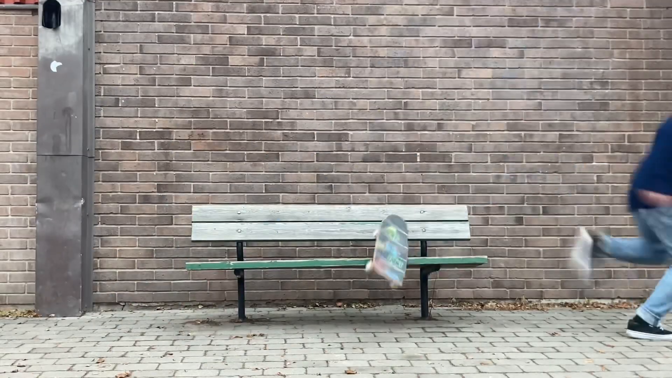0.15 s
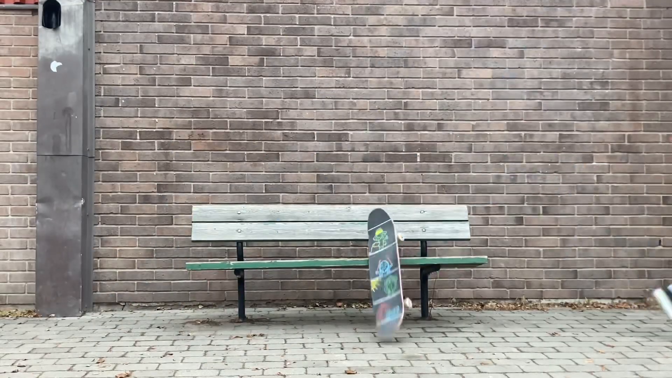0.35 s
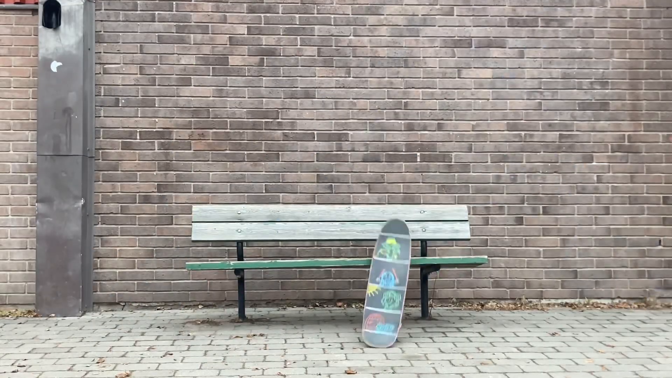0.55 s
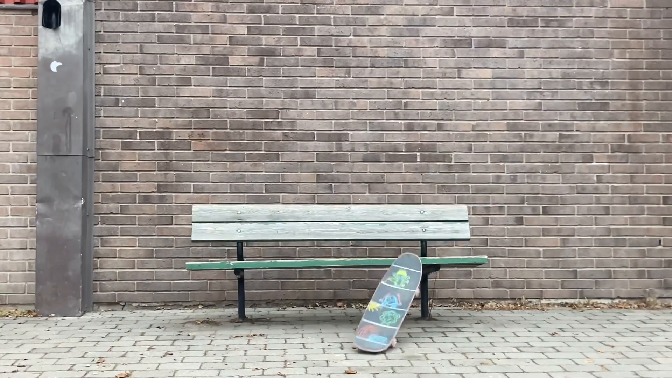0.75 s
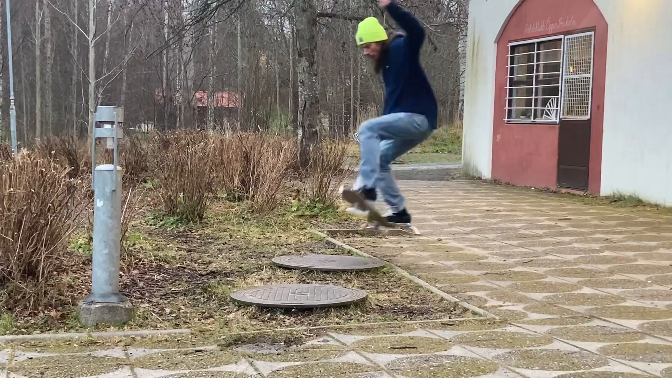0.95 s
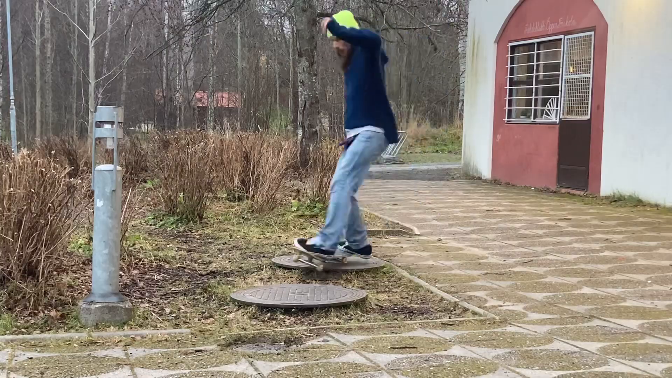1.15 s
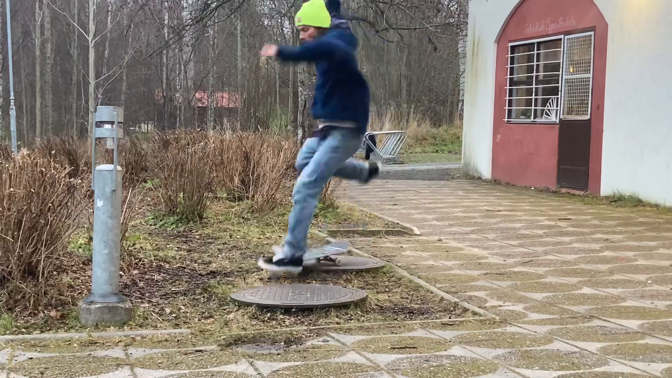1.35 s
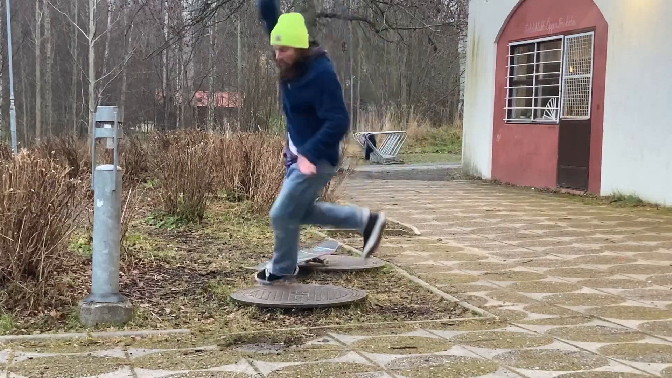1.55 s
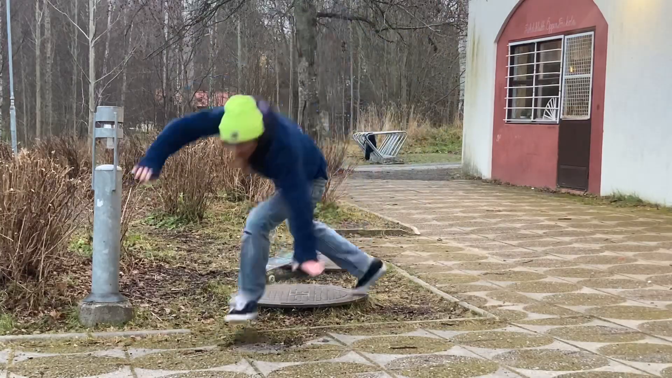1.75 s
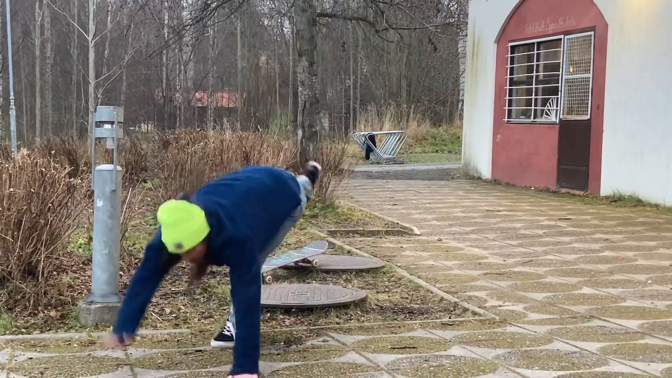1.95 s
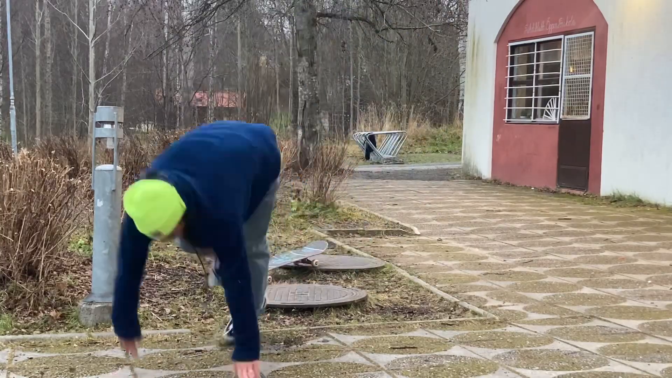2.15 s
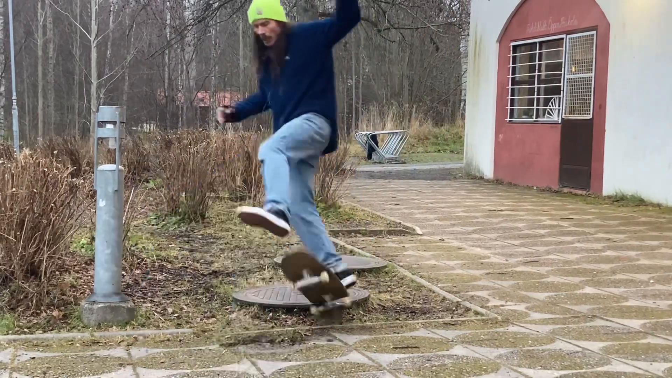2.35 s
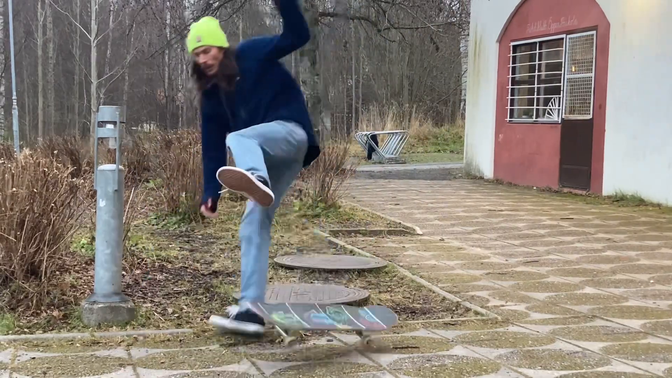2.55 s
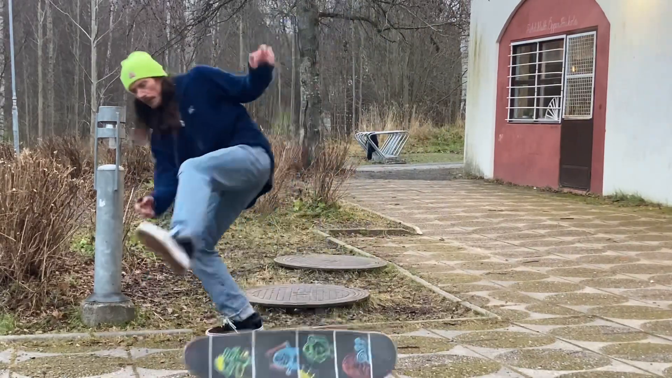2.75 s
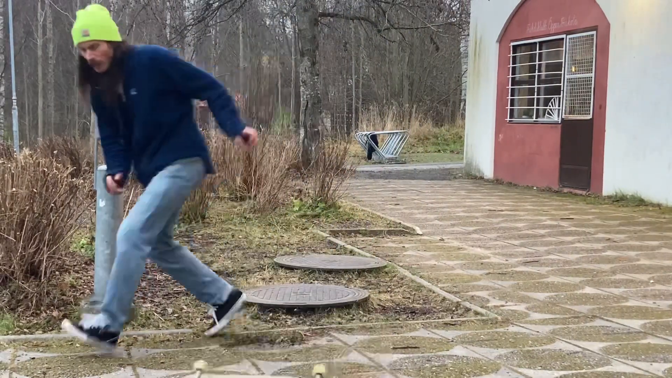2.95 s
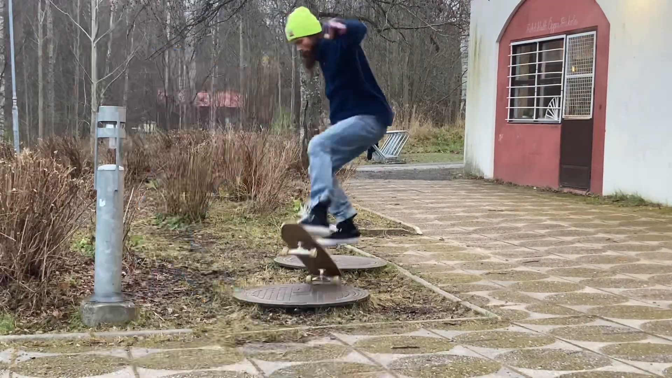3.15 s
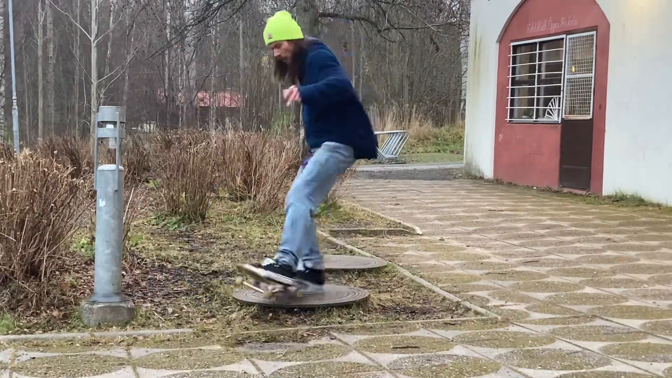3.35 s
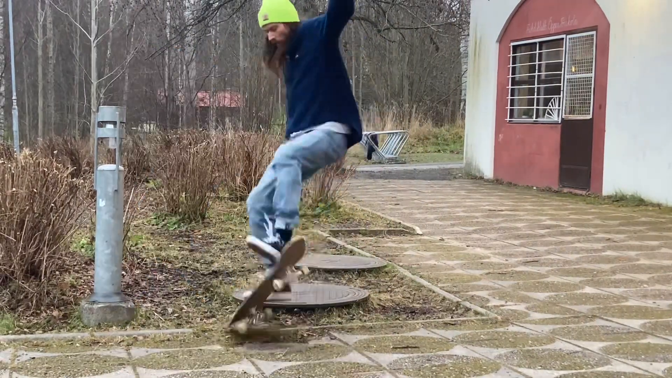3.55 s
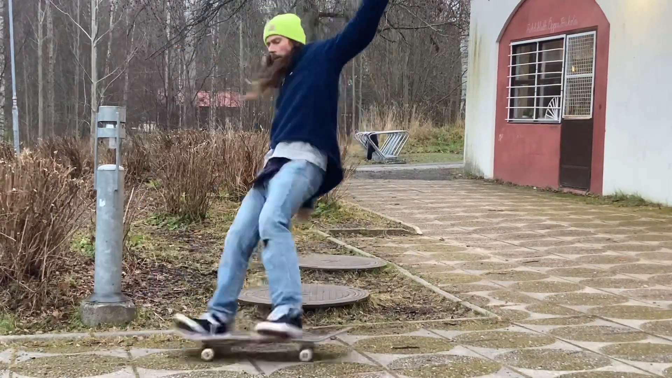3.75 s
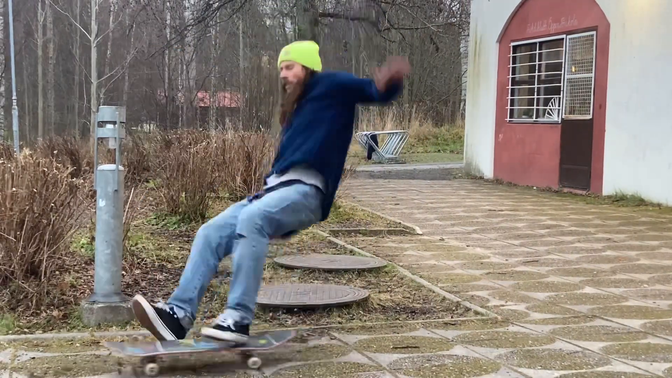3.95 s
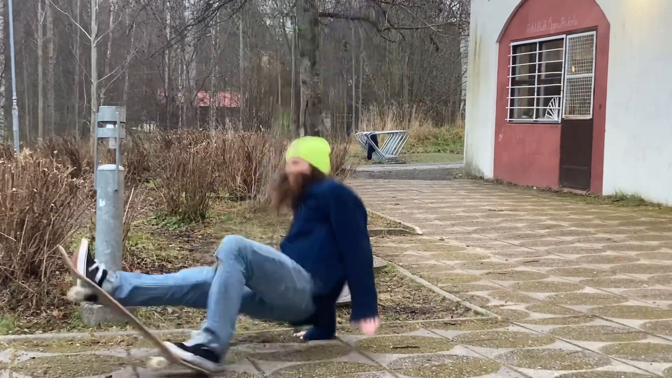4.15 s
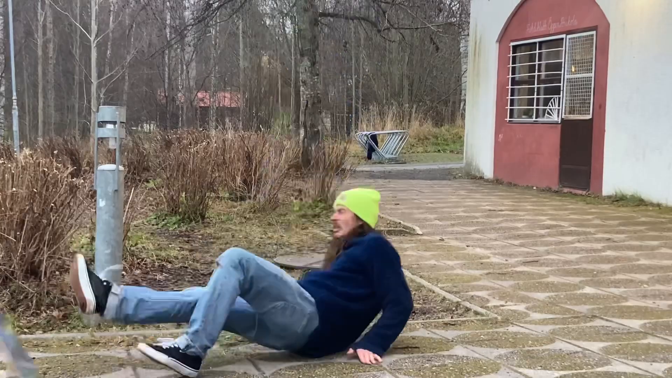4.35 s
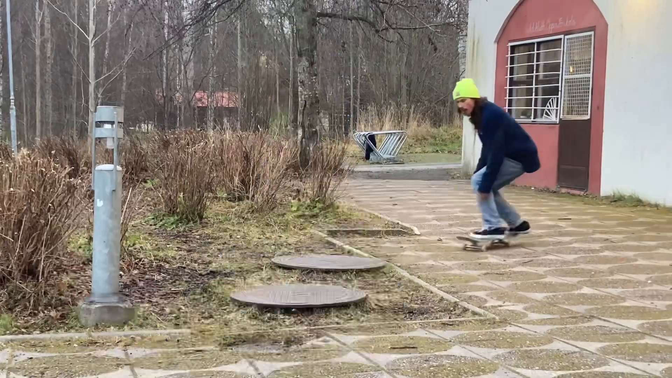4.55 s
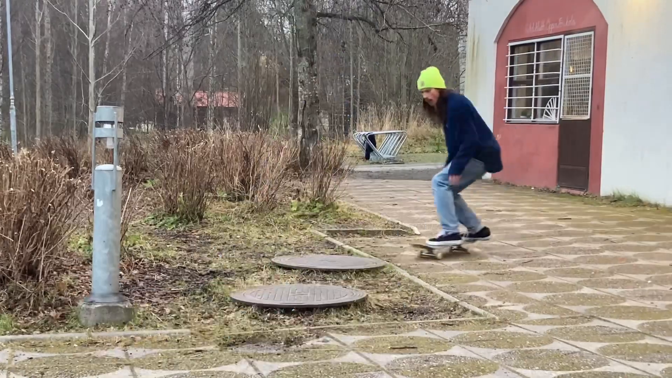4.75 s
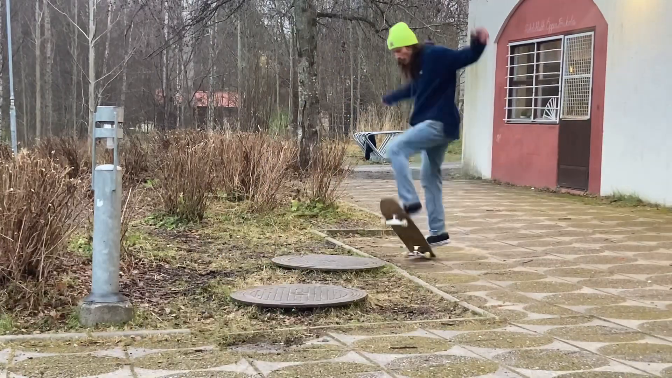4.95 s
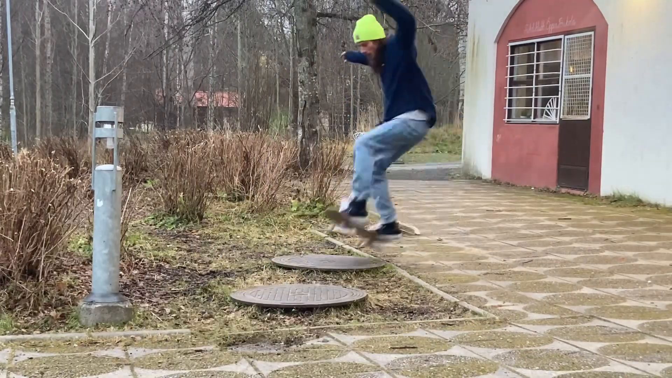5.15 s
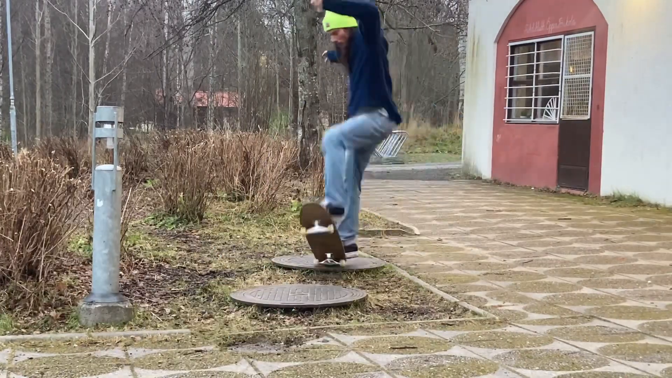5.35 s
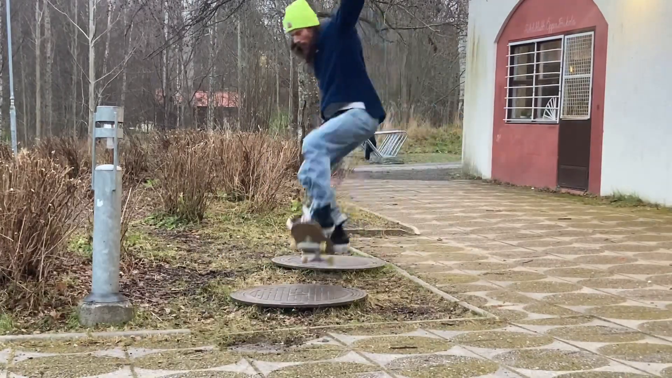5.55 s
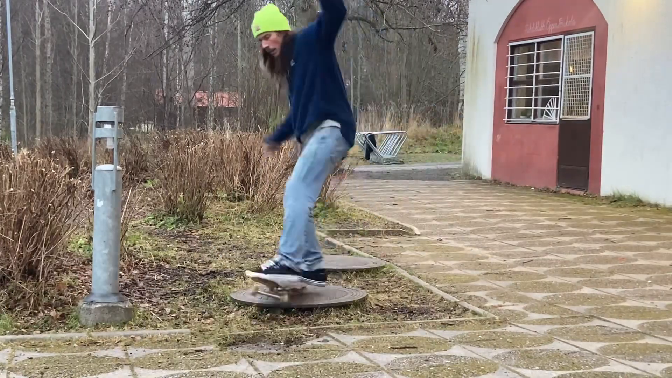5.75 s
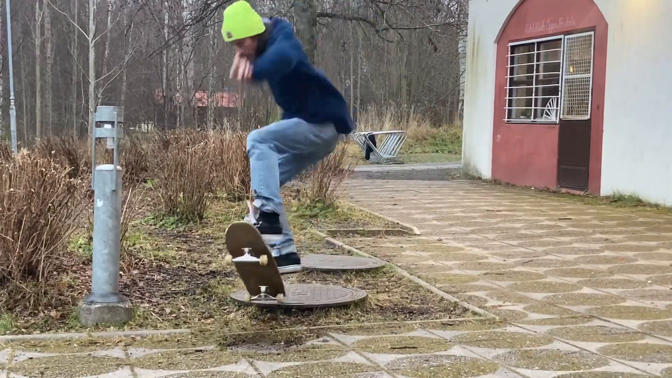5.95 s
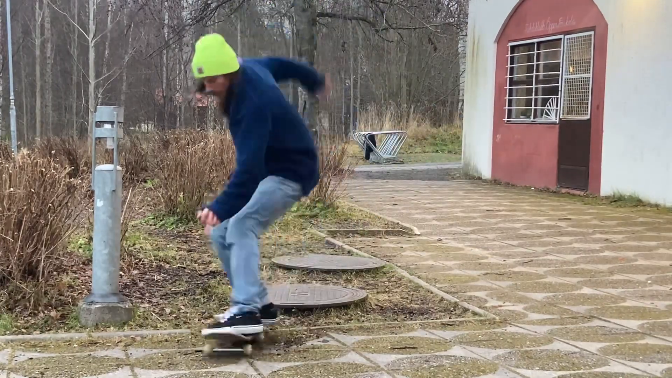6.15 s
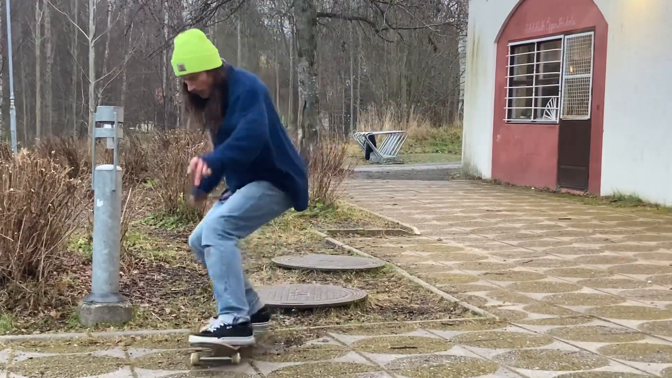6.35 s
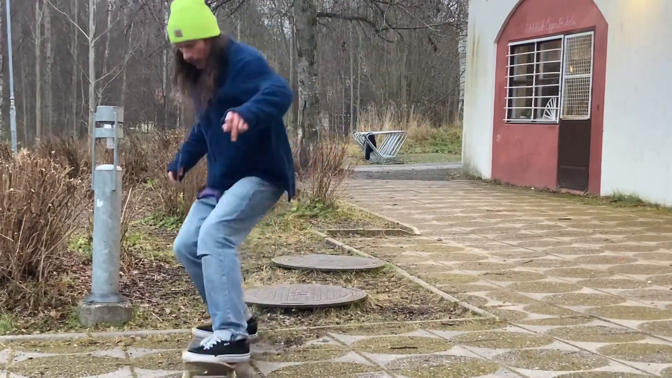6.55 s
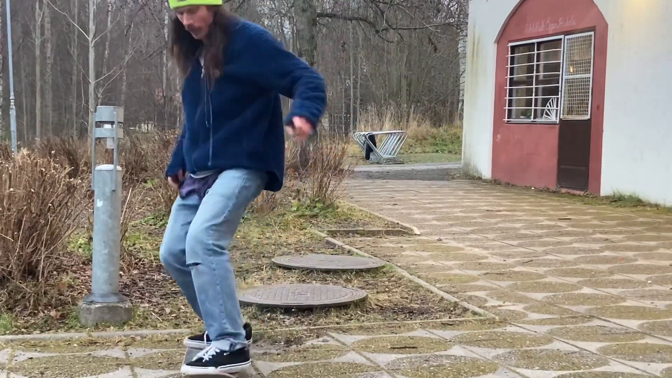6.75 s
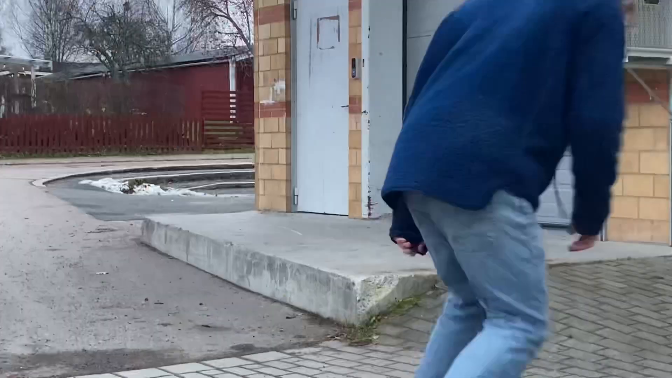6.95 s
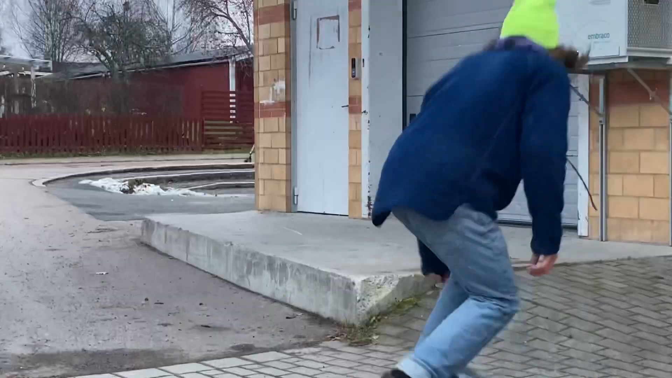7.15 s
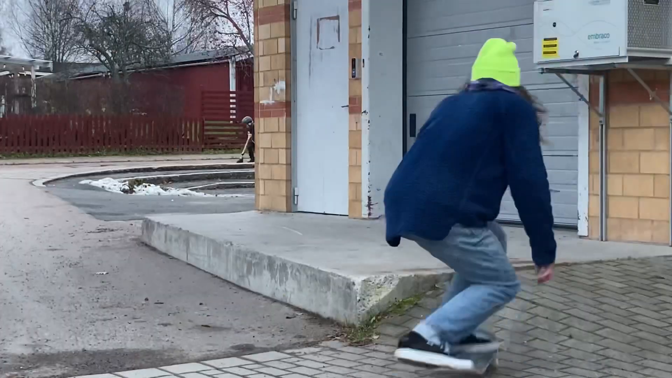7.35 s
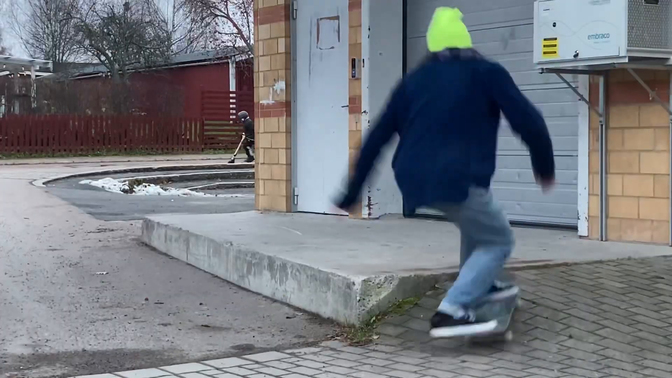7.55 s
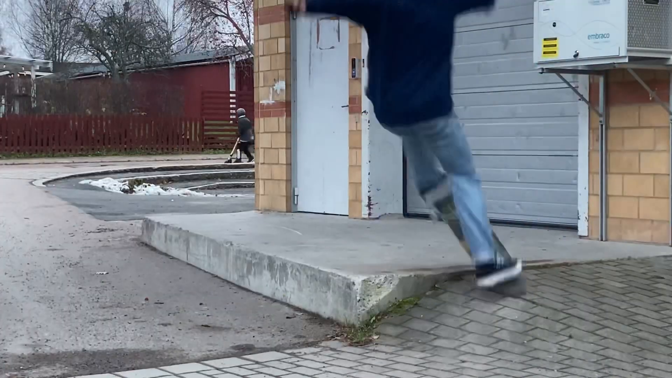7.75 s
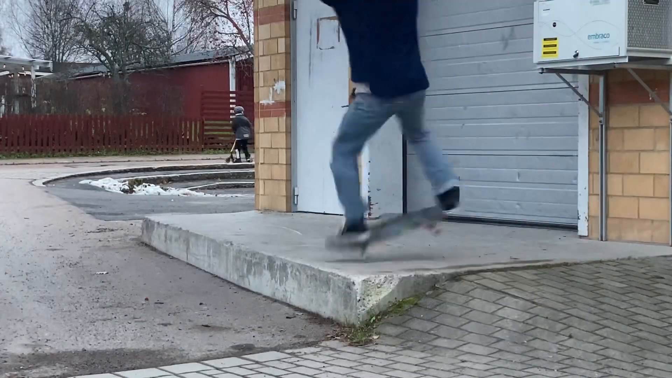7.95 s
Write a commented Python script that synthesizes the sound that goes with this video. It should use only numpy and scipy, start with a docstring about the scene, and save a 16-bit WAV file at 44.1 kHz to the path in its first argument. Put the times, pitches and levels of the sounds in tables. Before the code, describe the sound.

Outdoor skateboard attempts, picked up by a small stereo microphone with faint open air and thin wall echoes. At 0 s a shoe thuds; wheels whirr faintly, then at 0.4 the board cracks down from a bench, its plank booming low, and clatters until 0.9. At 1.08 it lands with an iron clunk; scuffing footfalls follow at 1.3-1.9. A new try from 2.2 brings dense clatter, scraping, and a flat, very sharp slap at 2.84. Pops and cover landings continue at 2.96, 3.24 and 3.44, then rattling, gritty tumbling and a tiny squeak around 4.15-4.5. Rolling over joints leads at 4.6-5 to a piercing pop at 5.0, landings at 5.23 and 5.64, pops at 5.4 and 5.93, a hard clack at 6.1, and rattly rolling fading toward 7. From 7 a low fan hums under bumpy block rolling; a loud pop cracks at 7.76, leaving whirring wheels and a final knock at 7.99.

```python
"""A skater's tries: first a board clatters off a bench, whose plank booms. Then it is popped and landed on
manhole covers and paving, tumbles after a fall and rolls away; last it is popped at a concrete ledge by a
humming fan. Blows ring damped modes of deck, trucks, tail and iron and spray contact noise; rolling is coloured
noise, bumps, ticks and crunching grit. Thin echoes from walls reach a two-port microphone over faint open air."""
import sys
import numpy as np
from scipy import signal
from scipy.fft import rfft, irfft
from scipy.io import wavfile

SR = 44100
rng = np.random.default_rng(int(sys.argv[2]) if len(sys.argv) > 2 else 0)


def wav_record(signal):
    """Record a signal, one row per channel, as 16-bit PCM in the file named by sys.argv[1]."""
    frames = np.transpose(np.atleast_2d(signal))
    bounded = np.clip(frames, -1, 1)
    # unit amplitude maps onto the largest positive 16-bit level
    quanta = np.round(bounded * 32767).astype(np.int16)
    wavfile.write(sys.argv[1], SR, quanta)


N = 352800  # 8 s
T = np.arange(7200) / SR  # time axis of a single hit [s]
ATTACK = int(.015 * SR)  # the stretch that sets a hit's level [samples]

# Levels in all tables are relative: the functions add their own trims. Spectra are in dB per Hz.


def amp(db):
    """Decibels to gain."""
    return np.exp(np.asarray(db) * (np.log(10) / 20))


def unit(x):
    """Scales to rms 1."""
    return x / np.sqrt(np.mean(x ** 2) + 1e-20)


def blow(x):
    """Scales a hit so that its attack has rms 1."""
    return x / np.sqrt(np.mean(x[:ATTACK] ** 2) + 1e-20)


def read(points, hz):
    """Reads a table on a log-frequency axis."""
    f, value = np.transpose(points)
    return np.interp(np.log(hz + 1), np.log(f + 1), value)


def colour(x, spectrum):
    """Filters a signal with a table of levels over frequency."""
    n = x.shape[-1]
    gain = amp(read(spectrum, np.fft.rfftfreq(n, 1 / SR)))
    return irfft(rfft(x) * gain, n)


def add(mix, s, sound):
    """Mixes a sound in at time s."""
    part = mix[max(round(s * SR), 0):][:len(sound)]
    part += sound[:len(part)]


def wander(rate_hz):
    """Slow chance with rms 1: noise that falls away above the rate."""
    hz = np.fft.rfftfreq(N, 1 / SR)
    return unit(irfft(rfft(rng.standard_normal(N)) / (1 + (hz / rate_hz) ** 4), N))


def clicks(per_s):
    """Contacts of random size at random moments, rms 1."""
    return unit(rng.standard_normal(N) * (rng.random(N) < per_s / SR))


def stretch(start, end, db, change_db, attack, fade_db_per_s):
    """An envelope: quick attack, a hold that swells or sags evenly, then a fade."""
    t = np.arange(N) / SR
    held = np.clip((t - start) / max(end - start, 1e-3), 0, 1)
    fade_db = np.clip(fade_db_per_s * (t - end), 0, 200)
    return np.clip((t - start) / attack, 0, 1) * amp(db + change_db * held - fade_db)


def burst(spectrum, t60, rise=0.00092):
    """A dying spray of tiny contacts of uneven size."""
    size = np.repeat(amp(4 * rng.standard_normal(len(T) // 24)), 24)
    spray = colour(rng.standard_normal(len(T)) * size, spectrum)
    return blow(spray * (1 - np.exp(-T / rise)) * amp(-60 * T / t60))


def ring(modes, scale, t60, spread_db, rise, detune=0.028):
    """Struck modes that die together; strength, sign and a slight detuning of each are drawn at random."""
    hz, db = np.transpose(modes)[:, :, None]
    size = amp(db + spread_db * rng.standard_normal(hz.shape)) * rng.choice([-1, 1], hz.shape)
    hz = hz * scale * (1 + detune * rng.standard_normal(hz.shape))
    waves = (size * np.sin(2 * np.pi * hz * T)).sum(0)
    return blow(waves * (1 - np.exp(-T / rise)) * np.exp(-np.log(1000) * T / t60))


def chatter(x, span, share, count=3):
    """The other wheels touch down a few milliseconds after the first."""
    out = x.copy()
    for s, size in rng.random((count, 2)):
        add(out, span * (s + 0.13), share * (2 * size - 1) * x)
    return blow(out)


# bending modes of the loaded deck: (f/Hz, level/dB)
DECK = [(245, -2), (285, -3.5), (335, -3), (410, -7.5), (533, -3.5), (640, -14.5)]
# stiff modes of plywood and trucks: (f/Hz, level/dB)
TRUCKS = [(860, -1), (1020, 4), (1220, 6), (1400, 4.5), (1620, 2), (1900, -3), (2350, -8.5)]
DECK_HZ, TRUCKS_HZ = 300, 1300  # the pitches at which these mode tables apply
DECK_T60, TRUCK_T60, CLACK_T60 = .066, .036, .04  # s; the last two before the choke
# colours of contact noise, dull push to bright grains: (f/Hz, level/dB per Hz)
THUD = [(25, -10), (60, -5.5), (110, 10.5), (170, -2.5), (260, -3.5), (600, -8), (3000, -90)]
BODY = [(100, -57), (220, -0.5), (350, 0.5), (600, 6), (850, -17), (3000, -24)]
CLACK = [(300, -0.5), (750, 0), (1400, 2), (2200, -12.5), (3000, -27.5), (7000, -31)]
CRACK = [(1200, -8), (2400, 1), (3300, -1.5), (4400, -8.5), (5500, -12), (7000, -23), (14000, -71)]
GRIT = [(1500, 10.5), (4000, -15.5), (6500, 4.5), (8000, 6.5), (10500, 5.5), (13000, 0.5), (15700, -1.5)]
# a hard clack is choked by the rider's weight: (clack level/dB, ring length as a factor)
CHOKE = [(-25.5, 1.22), (-6.5, 0.37)]
BOOM_DB_PER_OCTAVE = -14  # a lightly loaded deck has less boom


def knock(boom_db, thump_db, clack_db, crack_db, grit_db, deck_hz=300, clack_hz=1300):
    """One axle lands: it bends the deck, rattles the trucks and crushes grit."""
    length = np.interp(clack_db, *np.transpose(CHOKE))
    low, high = deck_hz / DECK_HZ, clack_hz / TRUCKS_HZ
    boom = burst(THUD, t60=0.074, rise=0.001)
    deck = ring(DECK, low, DECK_T60, spread_db=3.0, rise=0.0022)
    deck = deck + amp(-17) * burst(np.multiply(BODY, [low, 1]), t60=0.094)
    trucks = ring(TRUCKS, high, TRUCK_T60 * length, spread_db=3, rise=0.0004)
    trucks = trucks + amp(-4) * burst(CLACK, t60=CLACK_T60 * length)
    return (amp(boom_db + BOOM_DB_PER_OCTAVE * np.log2(low)) * boom
            + amp(thump_db - 1.5) * blow(deck)
            + amp(clack_db - 5.0) * chatter(blow(trucks), span=0.005637, share=0.58)
            + amp(crack_db - 4.5) * burst(CRACK, t60=0.047 * length, rise=0.0012)
            + amp(grit_db) * burst(GRIT, t60=0.039, rise=0.000081))


# wheels and deck hit the ground; the deck rings lower the more weight is on it:
# (t/s, deck thump level/dB, deck f/Hz, truck clack level/dB, clack f/Hz, crack level/dB)
KNOCKS = [(0.029, -29, 303, -28.5, 1650, -34), (0.045, -24.5, 320, -41, 1320, -30.5),
          (0.394, -15, 301, -17, 1426, -21), (0.571, -17.5, 322, -15.5, 1420, -23.5),
          (0.587, -20.5, 302, -19, 1656, -23), (0.653, -26, 362, -29, 1300, -33),
          (0.669, -32, 333, -27, 1380, -33), (0.735, -27.5, 289, -27.5, 1294, -30.5),
          (0.758, -25.5, 280, -28, 1400, -34), (0.773, -29, 268, -30, 1390, -35),
          (0.816, -21.5, 341, -27.5, 1170, -27.5), (0.907, -43, 496, -49, 1430, -44),
          (1.071, -19, 382, -19, 1250, -22.5), (1.076, -12, 268, -16, 923, -20),
          (1.092, -15, 326, -31, 1230, -24.5), (2.2459, -16.5, 278, -17.5, 1250, -37),
          (2.268, -11.5, 285, -27, 1327, -42), (2.281, -12, 293, -17, 1245, -18.5),
          (2.29, -29, 530, -38, 1390, -40), (2.303, -14, 308, -37, 1280, -31),
          (2.313, -19, 382, -30, 1560, -34), (2.326, -15.5, 310, -25, 1410, -27),
          (2.332, -25, 396, -26, 1690, -36), (2.414, -16, 308, -15.5, 1310, -18),
          (2.473, -20.5, 297, -16, 1410, -13.5), (2.696, -20.5, 278, -16.5, 1340, -23),
          (2.714, -31, 292, -28, 1540, -33), (2.757, -30.5, 329, -31, 1420, -29.5),
          (2.788, -26, 320, -21, 1470, -32), (2.792, -15.5, 263, -43, 1200, -55),
          (2.839, -14.5, 312, -14, 1414, -35), (2.939, -28, 516, -22, 1440, -18),
          (2.943, -16.5, 470, -20, 1370, -24), (2.958, -10, 302.5, -17, 970, -19),
          (2.973, -28, 293, -47, 1200, -29), (3.175, -20.5, 396, -11.5, 1230, -19),
          (3.227, -36, 320, -35, 1350, -33), (3.238, -12, 304, -16, 1000, -21.5),
          (3.336, -25, 280, -40, 1200, -47), (3.379, -20.5, 260, -32.5, 1360, -55),
          (3.427, -18.5, 197, -21.5, 1110, -44), (3.605, -27, 356, -20, 1700, -24.5),
          (3.619, -21.5, 317, -24, 1560, -28), (3.6343, -21.5, 347, -20.5, 1420, -23.5),
          (3.672, -14, 300, -25.5, 1170, -42), (3.685, -22, 205, -34, 1210, -40),
          (3.708, -35, 330, -29, 1330, -50), (3.721, -26, 307, -30, 1650, -47),
          (3.743, -17, 280, -20.5, 1670, -33), (3.752, -19.5, 369, -19.5, 1590, -22.5),
          (3.769, -22, 325, -17, 1250, -27), (3.797, -27, 544, -40, 1000, -48),
          (3.846, -48, 390, -38, 1680, -30), (3.904, -31, 328, -27, 1540, -34.5),
          (3.983, -41, 330, -29.5, 1640, -35), (3.999, -36, 305, -30.5, 1295, -28.5),
          (4.106, -18.5, 264, -32, 1190, -44), (4.119, -19, 372, -18, 930, -27),
          (4.129, -26, 297, -14.5, 1450, -27), (4.321, -22.5, 415, -26, 1183, -24),
          (4.354, -24.5, 420, -49, 1290, -27.5), (4.407, -30, 286, -28, 1110, -42),
          (4.416, -36, 330, -27, 1230, -48), (4.467, -18, 343, -20, 1296, -36),
          (4.481, -49, 374, -24.5, 1330, -65), (5.225, -12, 314, -10.5, 990, -21),
          (5.245, -14.5, 325, -35, 1290, -25), (5.378, -16, 281, -32, 1270, -33),
          (5.639, -13, 297, -10, 1028, -14.5), (5.789, -25, 297, -30, 1250, -45),
          (5.85, -21, 296, -22, 1166, -37), (6.055, -33, 302, -46, 1450, -26.5),
          (6.103, -22, 418, -10, 1590, -22), (6.131, -17.5, 435, -17.5, 895, -29),
          (6.141, -20.5, 183, -33, 1100, -46), (6.166, -30, 375, -40, 1210, -41),
          (6.334, -28, 248, -39, 1170, -58), (6.378, -23, 274, -24.5, 984, -52),
          (6.421, -27.5, 248, -39, 1120, -61), (6.48, -29, 261, -32.5, 1210, -62),
          (6.51, -42, 272, -39, 1330, -56), (6.539, -33, 257, -34, 1170, -59),
          (6.549, -38, 260, -37, 1390, -56), (6.583, -41, 300, -29, 1450, -44),
          (6.592, -39, 308, -37, 1380, -46), (6.622, -32, 284, -39, 1450, -50),
          (6.659, -31, 290, -30, 1360, -44), (6.672, -33, 327, -34, 1000, -48),
          (6.803, -31, 275, -38.5, 1380, -51), (6.832, -38, 260, -34, 1230, -49),
          (6.89, -33, 270, -34.5, 1160, -47), (6.917, -28, 238, -38, 1370, -60),
          (6.949, -36, 276, -30.5, 1246, -50), (7.037, -30, 322, -29, 1260, -44),
          (7.073, -44, 323, -24.5, 1270, -48), (7.111, -35, 330, -50, 1597, -35),
          (7.143, -25, 348, -24, 1350, -34), (7.186, -26.5, 318, -32, 1390, -44),
          (7.268, -29.5, 310, -27, 1453, -44), (7.374, -26, 348, -28, 1435, -50),
          (7.478, -30, 325, -31, 1400, -40), (7.529, -23.5, 324, -28, 1354, -35),
          (7.59, -21, 280, -26.5, 1550, -37), (7.624, -24, 318, -27, 1340, -38),
          (7.727, -30, 290, -31, 1700, -47), (7.99, -22.5, 297, -29, 1370, -20)]
# a landing's boom lies below its thump; the grit that it crushes grows with the hardness of the blow
BOOM_DB, CRUSH_DB, CRUSH_SLOPE, BENCH_CRUSH_DB = -12.5, -15, 0.74, -7.5
# the other axle comes down a moment later, softer and duller
AXLE_LAG_S, AXLE_THUMP_DB, AXLE_HARD_DB = .023, -17.5, -21.5


def knocks():
    """Each landing is one axle and then the other; the ground by the bench carries less grit."""
    out = np.zeros(N)
    for s, thump_db, deck_hz, clack_db, clack_hz, crack_db in KNOCKS:
        hardness_db = (clack_db + crack_db) / 2
        grit_db = CRUSH_DB + CRUSH_SLOPE * hardness_db + BENCH_CRUSH_DB * (s < BENCH_END_S)
        levels = np.array([thump_db + BOOM_DB, thump_db, clack_db, crack_db, grit_db])
        add(out, s, knock(*levels, deck_hz, clack_hz))
        second = knock(*(levels[:2] + AXLE_THUMP_DB), *(levels[2:] + AXLE_HARD_DB), deck_hz, clack_hz)
        add(out, s + AXLE_LAG_S * rng.uniform(.8, 1.2), second)
    return out


# the wooden tail snaps on stone:
# (t/s, ring f/Hz, ring level/dB, crack level/dB, crack f/Hz, grit level/dB, deck thump level/dB)
POPS = [(0.3945, 2000, -14.5, -24, 2200, -56, -39), (2.3537, 1750, -26, -25.5, 2000, -49, -29),
        (2.381, 2150, -31, -38, 2100, -52, -45), (2.957, 1466, -12.5, -25, 1800, -30, -33),
        (3.4359, 1470, -16, -21.5, 2000, -39, -24.5), (3.853, 1930, -31, -33.5, 2010, -31, -37),
        (4.1341, 1434, -12.5, -22.5, 1780, -28, -33), (4.165, 1800, -21.5, -31, 1990, -33, -29),
        (4.537, 1320, -22.5, -39, 2000, -33.5, -42), (5.0014, 3000, -25, -19, 2290, -49, -30),
        (5.01, 2200, -34, -29, 2190, -45, -27), (5.394, 1544, -21, -21.5, 2000, -38, -34),
        (5.433, 1580, -29, -29.5, 2000, -60, -43), (5.932, 1414, -12, -23.5, 1940, -36.5, -27),
        (6.102, 1020, -13, -22.5, 1980, -41, -19), (6.303, 1600, -37.5, -54, 2000, -45, -46),
        (7.758, 1205, -19.5, -17, 1750, -55, -35)]
# modes of the tail: (f as a multiple of the ring pitch, level/dB)
TAIL = [(.72, -35), (.87, -34), (1, 6), (1.17, -3.5), (1.3, -2.5), (1.5, -9), (1.85, -19)]
TAIL_T60 = .026  # s
# tail on stone: (f/Hz, level/dB per Hz)
SNAP = [(500, -9), (1100, -4), (2000, 6.5), (3200, 3.5), (4400, -6.5), (5500, -17), (8000, -19),
        (14000, -52)]
SNAP_HZ, FREE_DECK = 2010, 1.313  # the pitch at which SNAP applies; an unloaded deck rings this much higher


def pops():
    """The free tail rings briefly and high, with a broad crack and a light deck thump; ring and crack apart."""
    rings, cracks = np.zeros((2, N))
    for s, hz, ring_db, crack_db, crack_hz, grit_db, thump_db in POPS:
        wood = ring(TAIL, hz, TAIL_T60, spread_db=-1.0, rise=0.00033, detune=0.011)
        wood = wood + amp(-17.5) * burst(CLACK, t60=0.12, rise=0.00023)
        thump = ring(DECK, FREE_DECK, 0.031, spread_db=6, rise=0.00046)
        add(rings, s, amp(ring_db - 3.0) * blow(wood) + amp(thump_db) * thump)
        snap = burst(np.multiply(SNAP, [crack_hz / SNAP_HZ, 1]), t60=0.036, rise=0.0002)
        add(cracks, s, amp(crack_db + 2.0) * snap + amp(grit_db + .3) * burst(GRIT, t60=.035))
    return rings, cracks


# the end of the deck slaps the ground flat, with one sharp pressure spike: (t/s, level/dB)
SLAPS = [(0.3946, -16), (2.84, 1), (5.0012, 4), (5.931, -12), (7.757, -10)]


def slaps(hz=2700, t60=0.00078):
    """One heavily damped swing of pressure."""
    out = np.zeros(N)
    for s, db in SLAPS:
        add(out, s, amp(db - 2.5 - 60 * T / t60) * np.sin(2 * np.pi * hz * T))
    return out


# the board lands on an iron manhole cover: (t/s, level/dB)
COVER_HITS = [(1.078, -18), (2.268, -24), (2.303, -22), (2.961, -21), (3.238, -19), (5.226, -19.5),
              (5.641, -50)]
# modes of a cover, damped by its seat in the soil: (f/Hz, level/dB, t60/s)
COVER = [(241, 1.5, 0.14), (311, -3, 0.16), (360.5, -1.5, 0.14), (536, 3, 0.097), (1003, -1, 0.046),
         (1466, -12, 0.056)]


def covers(rise=0.0013):
    """A heavy iron lid answers a landing with a low, solid clunk."""
    out = np.zeros(N)
    hz, db, t60 = np.transpose(COVER)[:, :, None]
    for s, hit_db in COVER_HITS:
        size = amp(db + 3.1 * rng.standard_normal(hz.shape) - 60 * T / t60) * rng.choice([-1, 1], hz.shape)
        waves = (size * np.sin(2 * np.pi * hz * T)).sum(0)
        add(out, s, amp(hit_db) * blow(waves * (1 - np.exp(-T / rise))))
    return out


# an axle clicks against its washers and rings briefly: (t/s, level/dB)
PINGS = [(0.651, -31.5), (0.815, -38), (0.907, -41), (1.076, -21), (1.094, -31), (1.376, -41), (1.459, -50),
         (2.44, -35), (3.238, -28), (5.226, -24)]
# modes of the axle, before a slight lowering: (f/Hz, level/dB)
AXLE = [(2150, -9), (3650, -4), (4020, -3), (4500, -10)]


def pings():
    """Steel on steel: a sharp tick with a short, high ring."""
    out = np.zeros(N)
    for s, db in PINGS:
        steel = ring(AXLE, 0.98, t60=0.031, spread_db=2, rise=0.00018, detune=0.018)
        add(out, s, amp(db - 6) * (steel + amp(-6) * burst(CRACK, t60=.025, rise=.0001)))
    return out


# rattle of trucks and bearings: (f/Hz, level/dB per Hz)
RATTLE = [(600, -2), (1000, 0), (1400, -8), (1900, -2.5), (2400, -15), (3000, -8), (6000, -10.5)]


def rattles(per_s, count=8):
    """Sparse taps of uneven size, each ringing the trucks in one of several ways."""
    out = np.zeros(N)
    for _ in range(count):
        tap = ring(TRUCKS, rng.uniform(.85, 1.55), .016, spread_db=4.5, rise=.0003)
        tap = tap + burst(RATTLE, t60=.012, rise=.0002)
        out += signal.oaconvolve(clicks(per_s=per_s / count), blow(tap))[:N]
    return unit(out)


# wood and axles scrape over iron and stone: (start t/s, end t/s, level/dB)
SCRAPES = [(2.248, 2.413, -27.5), (2.47, 2.525, -28), (3.602, 3.813, -33.5), (4.104, 4.221, -32),
           (4.31, 4.362, -35), (4.405, 4.49, -64)]
# colour of the scrape: (f/Hz, level/dB per Hz)
SCRAPE = [(400, -42), (900, -11), (1400, 1.5), (2000, 3), (2800, 1), (4300, -9), (5800, -18), (14000, -33)]


def scrapes():
    """A sliding board sticks and slips hundreds of times a second, with rattling trucks."""
    pressure = np.zeros(N)
    for start, end, db in SCRAPES:
        length = max(round((end - start) * SR), 2)
        add(pressure, start, amp(db) * signal.windows.tukey(length, .5))
    slips = (clicks(per_s=420) + .15 * rng.standard_normal(N)) * amp(3.5 * wander(rate_hz=160))
    return pressure * unit(unit(colour(slips, SCRAPE)) + amp(-3.5) * rattles(per_s=190))


# an edge squeaks as it skids: (start t/s, end t/s, f/Hz, glide/Hz, level/dB)
SQUEAKS = [(4.156, 4.172, 1738, -45, -23.5), (4.318, 4.338, 1302, -12, -31.5)]


def squeaks(jitter=0.0242):
    """Stick and slip lock briefly onto a resonance of the deck, with an unsteady pitch."""
    overtones = [(1.001, -4), (1.529, -10), (2, -11)]  # (multiple of the pitch, level/dB)
    out = np.zeros(N)
    for start, end, hz, glide_hz, db in SQUEAKS:
        pitch = np.interp(np.arange(N) / SR, [start, end], [hz, hz + glide_hz])
        pitch = pitch * (1 + jitter * wander(rate_hz=136))
        phase = 2 * np.pi * np.cumsum(pitch) / SR
        tone = sum(amp(part_db) * np.sin(k * phase) for k, part_db in overtones)
        out += stretch(start, end, db, 0, 0.003, 990) * unit(tone)
    return out


# the board rolls over paving joints: (start t/s, end t/s, joints per s, thump level/dB)
JOINTS = [(4.58, 4.97, 36, -34), (7.05, 7.74, 20, -35.5)]
JOINT_SPREAD_DB, JOINT_CLACK_DB, JOINT_CRACK_DB = 1, -9, -24  # clack re thump, crack re clack


def joints():
    """The wheels drop into the gaps between paving stones at a loosely steady rate."""
    out = np.zeros(N)
    for start, end, per_s, db in JOINTS:
        for s in np.arange(start, end, 1 / per_s):
            size_db = db + JOINT_SPREAD_DB * rng.standard_normal()
            deck_hz, clack_hz = rng.uniform([220, 950], [400, 1600])
            clack_db = size_db + JOINT_CLACK_DB
            bump = knock(size_db + BOOM_DB, size_db, clack_db, clack_db + JOINT_CRACK_DB, clack_db - 13.0,
                         deck_hz, clack_hz)
            add(out, s + rng.uniform(-.5, .5) / per_s, bump)
    return out


# loose washers tick as the board rolls: rate, level re rumble, spread of sizes
TICKS_PER_S, TICK_DB, TICK_SPREAD_DB = 80, -16, 4


def ticks():
    """Dry ticks at random moments, each of its own pitch and size, for the small jolts of the rolling board."""
    out = np.zeros(N)
    count = round(TICKS_PER_S * N / SR)
    places, scales, sizes = rng.random(count), rng.uniform(.7, 1.5, count), rng.standard_normal(count)
    for place, scale, size in zip(places, scales, sizes):
        tick = ring(TRUCKS, scale, .014, spread_db=4, rise=.0002)
        add(out, place * N / SR, amp(TICK_DB + TICK_SPREAD_DB * min(size, 1.5)) * tick)
    return out


# wheels on the ground: (touch t/s, lift t/s, rumble level/dB, swell until lift/dB,
# tread noise level/dB re rumble, grit level/dB re rumble)
ROLLS = [(0.38, 0.847, -38.5, -2, -13, -10.5), (1.08, 1.168, -30, -1.5, -13, -15),
         (1.2, 1.407, -41.5, -9, -8.5, -15), (2.211, 2.353, -31.5, 2.5, -6.5, -14),
         (2.356, 2.456, -40.5, 9.5, -15, -17), (2.483, 2.563, -16.5, -26.5, -3, -9),
         (2.784, 2.863, -32, 1, -9, -30), (2.97, 3.002, -34.5, -0.5, -25, -3.5),
         (3.201, 3.286, -23, -5.5, -12.5, -15), (3.305, 3.422, -32.5, 12.5, -15, -14),
         (3.617, 3.782, -27, 3, -8.5, -11.5), (3.815, 4.072, -44, 5, -3, 0),
         (4.082, 4.188, -27.5, -1, -13, -16), (4.39, 4.51, -30.5, -7.5, -7, -3.5),
         (4.563, 4.965, -24.5, 1, -13.5, -14), (5.225, 5.314, -27.5, -3, -11, -15),
         (5.334, 5.399, -26.5, 0, -11, -12.5), (5.642, 5.802, -25.5, -10.5, -15, -10.5),
         (5.805, 5.87, -24, -5, -12.5, -11), (6.122, 6.18, -28.5, 0.5, -22, -22),
         (6.322, 6.764, -29.5, -8, -19, -14), (6.768, 6.958, -40, 4.5, -20, -10.5),
         (6.988, 7.387, -27.5, -8, -8.5, -11.5), (7.38, 7.774, -27.5, 0.5, -15, -14)]
TOUCH_S, RUMBLE_FADE_DB_PER_S, GRIT_FADE_DB_PER_S = 0.026, 228, 256


def roll_gains():
    """Gains of rumble, tread noise and grit: each swells or sags on the ground and dies after the lift."""
    gains = np.zeros((3, N))
    for start, end, db, swell_db, tread_db, grit_db in ROLLS:
        contact = stretch(start, end, db, swell_db, TOUCH_S, RUMBLE_FADE_DB_PER_S)
        gains[0] += contact ** 2
        gains[1] += (contact * amp(tread_db)) ** 2
        gains[2] += stretch(start, end, db + grit_db, swell_db, TOUCH_S, GRIT_FADE_DB_PER_S) ** 2
    return np.sqrt(gains)


# rumble on the paving, rumble on the small blocks by the ledge, tread noise: (f/Hz, level/dB per Hz)
RUMBLE = [(25, -54), (55, -21), (110, 7), (200, 4.5), (330, -1), (560, 1.5), (800, -12.5), (1500, -34),
          (5000, -83)]
BLOCK_RUMBLE = [(25, -38), (60, -20), (130, -11.5), (230, 4), (330, -0.5), (600, -0.5), (850, -15.5),
                (1500, -15.5), (5000, -51)]
TREAD = [(300, 6), (750, -8.5), (1100, 12), (1500, -19), (1950, 5), (2400, -31), (3200, -8), (4500, -2),
         (9000, -60)]


def wheels():
    """Bumps in the paving shake the deck; the same bumps rattle the trucks and crack sand grains."""
    bumps = wander(rate_hz=17.0)
    on_blocks = np.arange(N) / SR > LEDGE_START_S
    shake = rng.standard_normal(N) * amp(.8 * bumps)
    rumble = np.where(on_blocks, unit(colour(shake, BLOCK_RUMBLE)), unit(colour(shake, RUMBLE)))
    contacts = clicks(per_s=520) + 1.35 * rng.standard_normal(N)
    tread = unit(colour(contacts * amp(2.5 * bumps), TREAD))
    rattle = unit(rattles(per_s=340) * amp(1.6 * bumps))
    rattle = rattle * amp(np.where(on_blocks, -2, -5))
    sand = unit(clicks(per_s=2500) * amp(3.0 * np.minimum(rng.exponential(1, N), 5)))
    grit = unit(colour((sand + 0.71 * rng.standard_normal(N)) * amp(3.3 * bumps), GRIT))
    layers = np.array([rumble + ticks(), amp(-3.5) * tread + rattle, grit])
    gains = roll_gains()
    # four wheels meet different ground and reach the ports a little differently
    other_wheels = (gains * np.roll(layers, SR, axis=1)).sum(0)
    side = colour(other_wheels, [(100, -22.0), (300, -24), (550, -10), (3000, -0.5), (10000, -19.0)])
    return (gains * layers).sum(0) + np.array([side, -side])


# single stones crack under a wheel: (t/s, level/dB)
STONES = [(0.817, -32.5), (0.907, -46), (1.375, -43.5), (1.434, -50), (3.844, -31), (3.853, -36),
          (3.983, -45), (3.988, -49), (3.999, -26), (4.326, -30), (4.672, -36), (5.837, -37), (6.298, -43),
          (6.366, -40), (6.583, -40), (7.021, -35), (7.077, -39), (7.201, -34), (7.227, -35),
          (7.472, -31.5), (7.527, -33)]


def stones():
    """A crushed stone gives one very short, bright tick."""
    out = np.zeros(N)
    for s, db in STONES:
        add(out, s, amp(db) * burst(GRIT, t60=0.018, rise=0.00011))
    return out


# wheels spin in the air: (start t/s, end t/s, level/dB, fall/dB per s; a negative fall grows louder)
SPINS = [(0, 0.204, -54, -8), (0.17, 0.403, -44.5, 4), (0.393, 0.852, -42, 26), (7.717, 8, -35, 100)]
# whirr of free bearings: (f/Hz, level/dB per Hz)
WHIRR = [(900, -18.5), (1600, -3.5), (2200, 1), (2500, -9.5), (3000, -14), (4000, -21), (4700, -12.5),
         (5400, -23), (8000, -26)]


def bearings():
    """Wheels spin freely while the board is in the air: a hiss-like whirr that sinks or swells in level."""
    whirr = unit(colour(rng.standard_normal(N), WHIRR))
    spin = np.zeros(N)
    for start, end, db, fall in SPINS:
        spin += stretch(start, end, db, -fall * (end - start), attack=0.015, fade_db_per_s=560)
    return spin * whirr


# shoes and hands land on the ground: (t/s, thud level/dB, scuff level/dB, grit level/dB)
STEPS = [(0.028, -17, -42, -68), (0.231, -27, -22, -65), (1.28, -29, -36, -41), (1.426, -27.5, -32, -49),
         (1.635, -25.5, -23, -39.5), (1.65, -18.5, -13.5, -63), (1.689, -23.5, -26, -47),
         (1.807, -20, -15.5, -27.5), (1.835, -18.5, -49, -50), (1.861, -27, -62, -66),
         (2.012, -32, -53, -50), (3.387, -12, -50, -60)]


def steps():
    """The ground gives a dull push and a crackle, without ringing."""
    out = np.zeros(N)
    for s, thud_db, scuff_db, grit_db in STEPS:
        thud = burst(THUD, t60=0.11, rise=0.0013) + amp(-14.0) * burst(BODY, t60=0.21, rise=0.0031)
        add(out, s, amp(thud_db - 9.0) * blow(thud) + amp(scuff_db - 21.0) * burst(CLACK, t60=0.14))
        add(out, s, amp(grit_db - 7.0) * burst(GRIT, t60=0.045) + amp(grit_db - 7.5) * burst(CRACK, t60=0.095))
    return out


def bench(s=.398, hz=94.5, db=-29, t60=1.0):
    """The struck bench plank booms: one low, slowly dying mode."""
    t = np.maximum(np.arange(N) / SR - s, 0)
    return amp(db - 60 * t / t60) * np.sin(2 * np.pi * hz * t)


# level of a faint rustle between the blows: (t/s, level/dB)
RUSTLE_LEVEL = [(0, -43.5), (.85, -47), (1, -48.5), (1.45, -51.5), (2.15, -54), (2.6, -41.5), (3.12, -47.5),
                (3.498, -44), (4.3, -43), (5.08, -43), (5.58, -47), (6.02, -41.5), (7, -54), (8, -46)]
# colour of that rustle: (f/Hz, level/dB per Hz)
RUSTLE = [(60, 0), (130, -4), (330, 4), (600, -2), (900, -5.5), (1900, -7.5), (4500, -22), (8000, -24),
          (15000, -26)]


def rustle():
    """A faint, uneven rustle of grains and noise, as of clothes, dry leaves and loose grit."""
    level_db = np.interp(np.arange(N) / SR, *np.transpose(RUSTLE_LEVEL)) + 2.7 * wander(rate_hz=24)
    shared = 0.77 * clicks(per_s=750) + rng.standard_normal(N)
    grains = shared + 1.05 * rng.standard_normal((2, N))
    return amp(level_db) * unit(colour(grains, RUSTLE))


def fan(start=7.0, hz=59):
    """A cooling unit hums by the ledge, over a low rush of air."""
    t = np.arange(N) / SR
    hum = amp(-39.5 + .4 * wander(rate_hz=3)) * np.sqrt(2) * np.sin(2 * np.pi * hz * t)
    rush = unit(colour(rng.standard_normal(N), [(20, -25), (80, -11), (140, 8), (500, -11), (3000, -45)]))
    return (hum + amp(-47.0) * rush) * np.clip((t - start) / 0.019, 0, 1)


# distant town and open air: (f/Hz, level/dB per Hz)
AIR = [(20, -10), (45, 1), (65, 9), (120, -3), (300, -16), (600, -26), (1500, -72), (3000, -36),
       (6000, -31), (15000, -32.5)]


def air(db=-48):
    """Steady outdoor background noise, mostly shared by both ports."""
    shared, apart = rng.standard_normal(N), rng.standard_normal((2, N))
    return amp(db) * unit(colour(shared + 0.15 * apart, AIR))


# decay of the echo: (f/Hz, t60/s)
YARD = [(100, 0.22), (600, 0.43), (1800, 0.27), (3200, 0.29), (14000, 0.11)]


def yard(x, count=3):
    """Scattered reflections from walls and trees; treble dies first and sets of paths trade places in time."""
    out = np.zeros((2, N))
    for k in range(count):
        taps = rng.standard_normal((3, SR // 2)) * (rng.random((3, SR // 2)) < 2500 / SR)
        hz, t, z = signal.stft(taps[0] + 2.5 * taps[1:], SR, nperseg=256)
        z = z * amp(-60 * t / read(YARD, hz)[:, None]) * (1 - np.exp(-t / 0.0034))
        tail = signal.istft(z, SR, nperseg=256)[1]
        share = np.sqrt(2 / count) * np.cos(np.pi * (4 * np.arange(N) / SR + k / count))
        out += signal.fftconvolve((share * x)[None], tail / np.linalg.norm(tail[0]), axes=1)[:, :N]
    return out


def at_ports(x, phase):
    """Turns the phase of the two channels against each other, half the table's angle each way."""
    half = np.interp(np.fft.rfftfreq(N, 1 / SR), *np.transpose(phase)) / 2
    return irfft(rfft(x) * np.exp(1j * np.array([half, -half])), N)


# extra phase for sound that comes from the left: (f/Hz, phase/rad)
OFF_AXIS = [(0, 0), (700, .1), (1000, .35), (1800, .55), (3100, 1.8), (4300, .8), (5500, 2.2), (6400, 1.5),
            (7200, 0)]
# the level dips briefly: (t/s, depth/dB, half-width/s)
DIPS = [(0.924, 20, 0.0075), (2.211, 19, 0.0091), (3.026, 15.5, 0.014), (4.553, 13, 0.0063),
        (6.987, 17, 0.0054)]
BENCH_END_S, LEDGE_START_S = DIPS[0][0], DIPS[-1][0]


def scene():
    """The board, the skater and the surroundings; close walls by the bench and the ledge return more echo."""
    t = np.arange(N) / SR
    landings = knocks() + covers() + pings() + joints() + scrapes() + squeaks()
    rolling = wheels()
    rings, cracks = pops()
    cracks = cracks + slaps()
    small = steps() + stones() + bearings() + bench() + fan() + rustle()
    by_wall = (t < BENCH_END_S) | (t > LEDGE_START_S)
    # the broad crack of a pop carries to the walls better than its ring
    pop_spread = amp(-7) * rings + amp(1.5) * cracks
    radiated = (landings + pop_spread + amp(-5.0) * rolling[0]) * amp(2.4 * by_wall)
    echo = colour(yard(radiated), [(80, -24.0), (400, -24.5), (1200, -16.0), (2100, -18.5),
                                   (3000, -16.5), (8000, -12.0)])
    dips_db = sum(depth * np.exp(-((t - s) / width) ** 2) for s, depth, width in DIPS)
    board = at_ports(landings + rings + cracks, OFF_AXIS)
    return (board + rolling + small + echo + air()) * amp(-dips_db)


# phase between the microphone ports: (f/Hz, phase/rad)
PORTS = [(0, 0), (400, -.1), (680, -.55), (950, .05), (7100, 0), (9200, -3.14), (9600, -3.3), (11000, -6.1),
         (11700, -6.4), (13600, -9.42), (14300, -9.7), (15300, -12.56)]


def record(dry):
    """The ports differ in phase and colour; deep bass is cut, peaks are rounded off, then the band is limited."""
    left, right = at_ports(dry, PORTS)
    left = colour(left, [(60, -1.2), (300, 0.085), (1000, 1.24), (2000, 0.43), (5800, -1.2), (8000, -0.28)])
    bass_cut = signal.butter(3, 42, "high", fs=SR, output="sos")
    pair = signal.sosfilt(bass_cut, np.array([left, right]))
    rounded = pair / (1 + (pair / .92) ** 6) ** (1 / 6)
    band_limit = signal.firwin(255, 15850, window=("kaiser", 9), fs=SR)
    return signal.oaconvolve(rounded, band_limit[None], "same")


dry = scene()
out = record(dry)
wav_record(out)
```